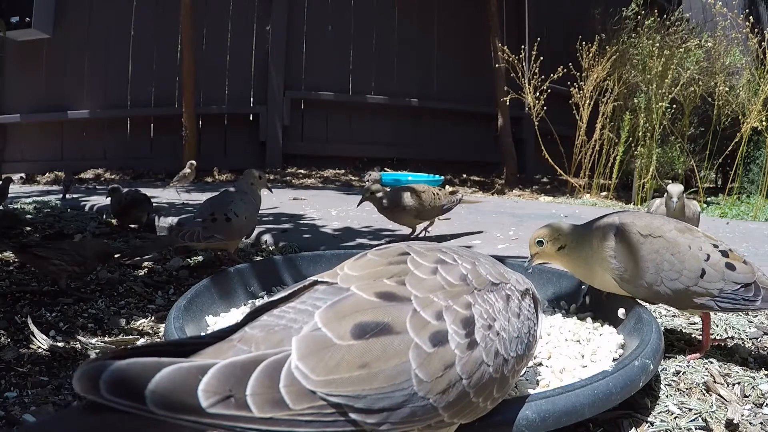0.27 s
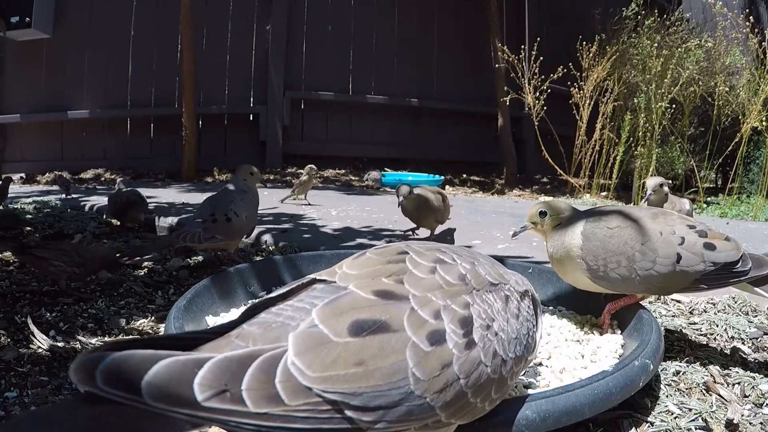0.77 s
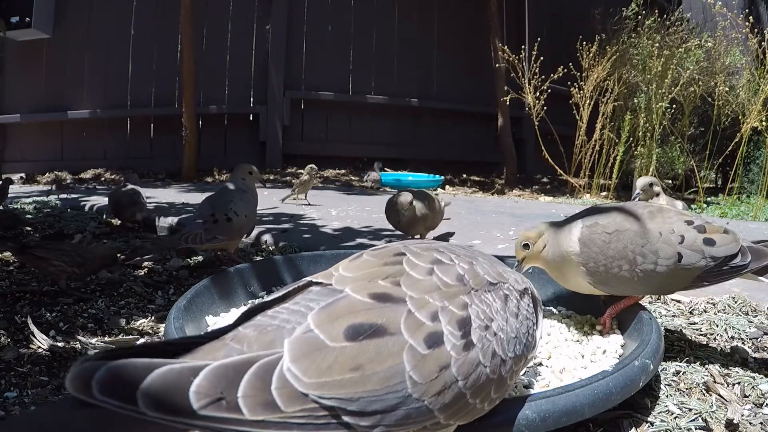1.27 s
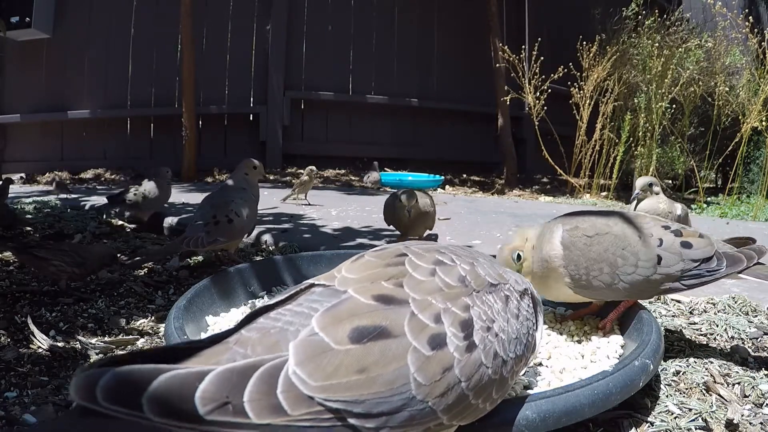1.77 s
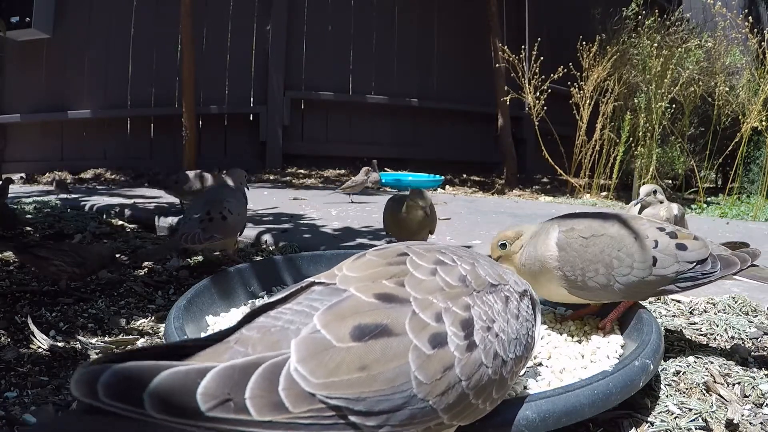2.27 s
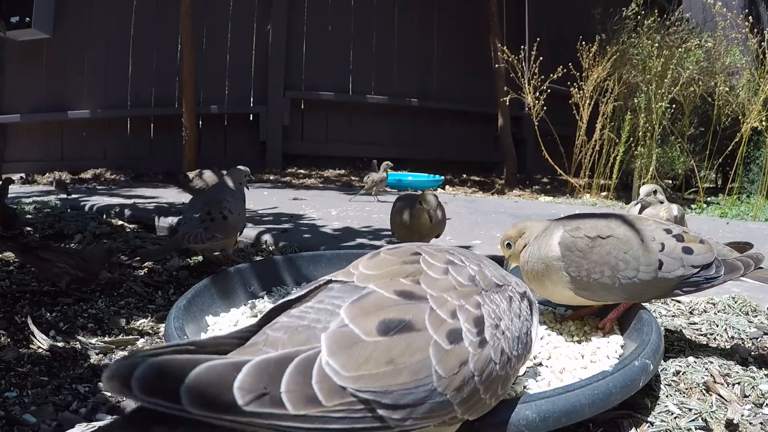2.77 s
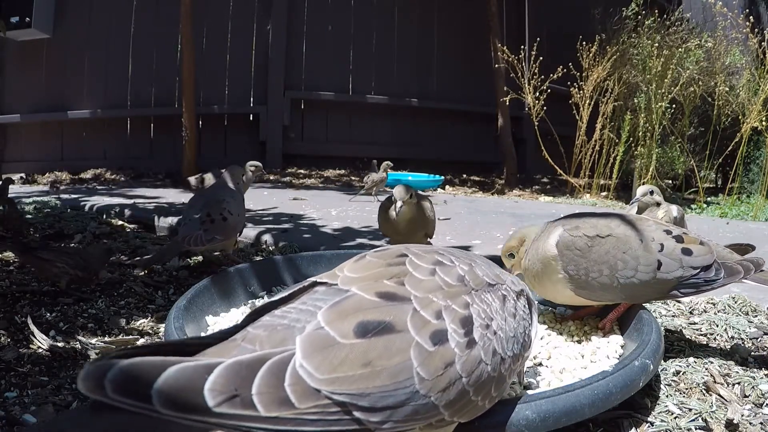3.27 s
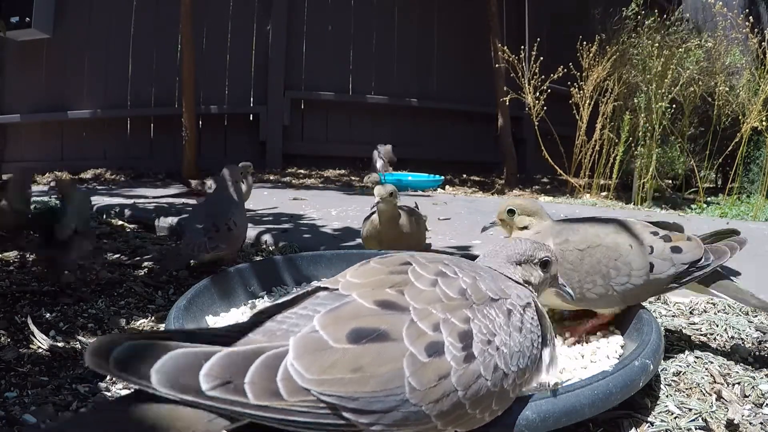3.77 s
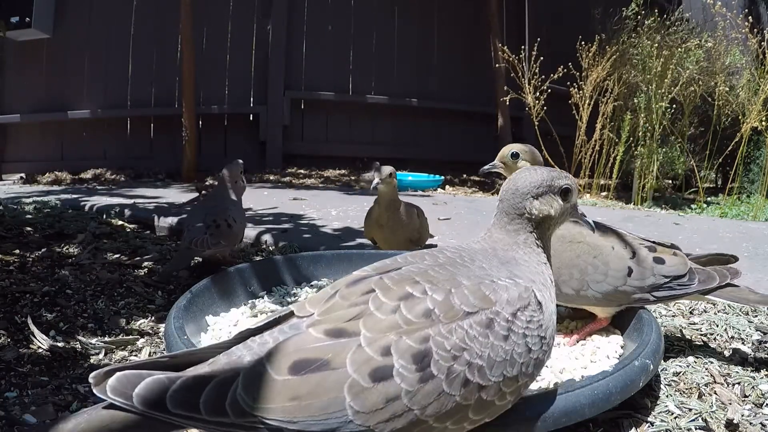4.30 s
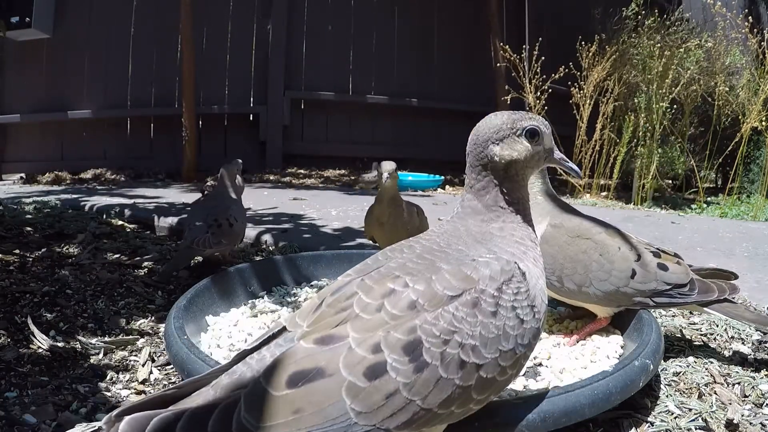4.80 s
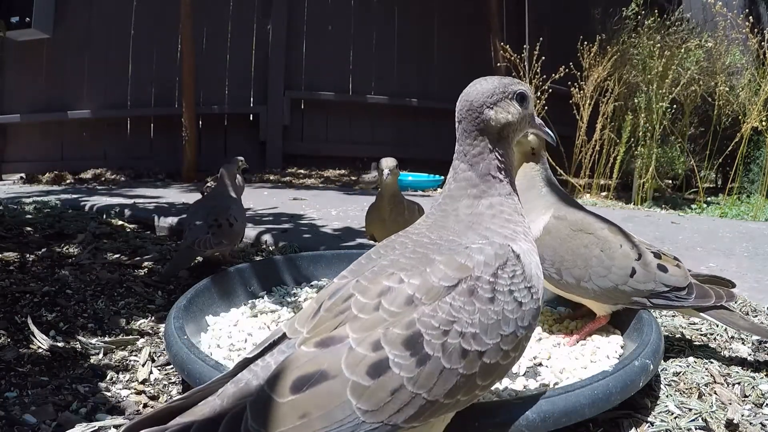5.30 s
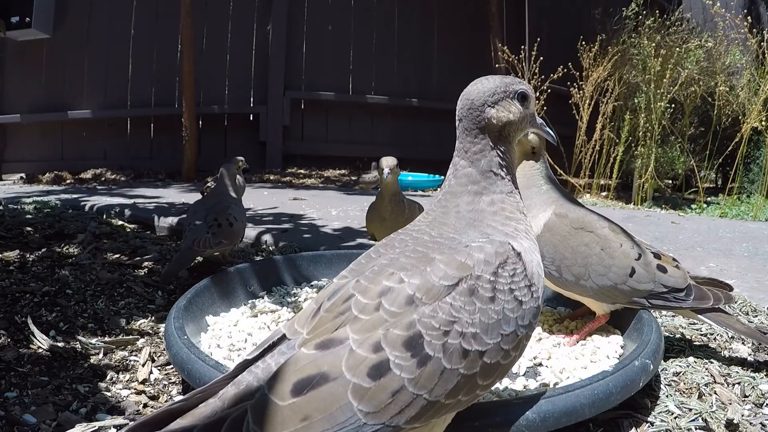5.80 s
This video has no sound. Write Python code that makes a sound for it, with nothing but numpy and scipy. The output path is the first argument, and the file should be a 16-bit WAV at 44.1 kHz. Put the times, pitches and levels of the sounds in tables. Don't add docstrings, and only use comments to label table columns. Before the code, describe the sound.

Seeds tick in a plastic dish, feathers knock and scrape right against the microphone, then doves flush with sharp wing claps and fading flaps.

```python
import sys
import numpy as np
from scipy import signal
from scipy.fft import rfft, irfft
from scipy.io import wavfile
from scipy.ndimage import uniform_filter1d

SR = 44100
rng = np.random.default_rng(int(sys.argv[2]) if len(sys.argv) > 2 else 0)


def ratio(d):
    e = np.asarray(d, float) / 20
    return 10 ** e


def bounce(signal):
    frames = np.transpose(np.atleast_2d(signal))
    limited = np.clip(frames, -1, 1)
    pcm = np.round(limited * 32767).astype(np.int16)
    wavfile.write(sys.argv[1], SR, pcm)


N = 266760
T = np.arange(N) / SR
LEFT_RIGHT = np.array([[1], [-1]])


def shape(x, table):
    hz, db = np.transpose(table)
    log_f = np.log(np.arange(x.shape[-1] // 2 + 1) * SR / x.shape[-1] + 1)
    return irfft(rfft(x) * ratio(np.interp(log_f, np.log(hz), db)), x.shape[-1])


def band(x, lo_hz, hi_hz, order=2):
    sos = signal.butter(order, [lo_hz, min(hi_hz, .45 * SR)], "bandpass", fs=SR, output="sos")
    return signal.sosfilt(sos, x) * np.sqrt(SR / 2 / (hi_hz - lo_hz))


def unit(x):
    return x / np.sqrt(np.mean(x ** 2))


def walk(rate_hz):
    hold = int(SR / rate_hz)
    steps = np.repeat(rng.standard_normal(N // hold + 1), hold)
    return 1.07 * uniform_filter1d(uniform_filter1d(steps, hold), hold)[:N]


def grit(size, spread_db):
    return rng.standard_normal(size) * ratio(spread_db * rng.exponential(size=size))


def contact(rise_ms, fall_ms, size=4096, lead=1024):
    ms = (np.arange(size) - lead) * 1000 / SR
    return ratio(np.where(ms < 0, 9 * ms / max(rise_ms, .05), -9 * ms / max(fall_ms, .05)))


def swell(s, db, rise_s, fall_s):
    return ratio(db - 8.94 * np.where(T < s, (s - T) / rise_s, (T - s) / fall_s))


def add(out, s, piece, db, lead):
    peak = uniform_filter1d(np.mean(piece ** 2, axis=0), size=60).max()
    i = int(s * SR) - lead
    n = min(piece.shape[1], N - i)
    out[:, i:i + n] += piece[:, :n] * ratio(db) / np.sqrt(peak)


# f/Hz, likeness/-1..1
PORT_LIKENESS = [(30, 0.8), (70, 0.33), (200, 0.4), (350, 0.22), (500, -0.04), (800, -0.7), (1500, -0.4),
                 (2300, -0.23), (3300, 0.4), (4200, 0.48), (5500, 0.033), (7500, -0.26), (12000, 0.043)]
# f/Hz, level/dB
LEFT_PORT_COLOUR = [(5000, 0.0), (8000, -1.6), (14000, -2)]


def ports(pair):
    likeness = np.clip(PORT_LIKENESS, -.95, None)
    side_db = [(hz, 10 * np.log10((1 - c) / (1 + c))) for hz, c in likeness]
    side = shape(pair[1], side_db)
    return np.array([shape(pair[0] + side, LEFT_PORT_COLOUR), pair[0] - side])


def soften(x):
    return signal.sosfilt(signal.butter(10, 14300, fs=SR, output="sos"), x)


def ring(modes, favour_hz, damping):
    favour_db, favour_octaves, scatter_db, detune = 5.5, 0.22, 1.8, 0.025
    t = np.arange(1280) / SR
    out = np.zeros((2, 1280))
    for hz, t60_s, left_db, right_db, phase_rad in modes:
        a, b = rng.standard_normal(2)
        near_db = favour_db * np.exp(-(np.log2(hz / favour_hz) / favour_octaves) ** 2)
        fade = ratio(scatter_db * a + near_db - 60 * damping * t / t60_s)
        fade = fade * (1 - np.exp(-t / .0011)) / np.sqrt(t60_s)
        angle = 2 * np.pi * hz * (1 + detune * b) * t
        out += fade * np.array([ratio(left_db) * np.sin(angle), ratio(right_db) * np.sin(angle + phase_rad)])
    return out


# f/Hz, t60/s, left level/dB, right level/dB, right phase/rad
LOWER_MODES = [(200, 0.038, -22, -14.5, 2), (327, 0.014, -17, -15, 2.5), (544, 0.028, -10.5, -10.5, 3),
               (670, 0.014, -9, -8, 3), (847, 0.02, -3.5, -2, 3), (948, 0.018, -12.5, -6, 4),
               (1130, 0.019, -1.5, 1, -3), (1256, 0.025, -1, 0.5, -2.5), (1420, 0.022, -6, -5, -2),
               (1700, 0.019, -8.5, -6.5, -2.0)]
# f/Hz, t60/s, left level/dB, right level/dB, right phase/rad
UPPER_MODES = [(2170, 0.019, -4.5, -9, 3.5), (2380, 0.017, 2, -8, 3), (2800, 0.0096, -9, -12.5, 0),
               (3380, 0.02, -11.5, -7, -0.8), (3890, 0.01, -10, -14, -0.7)]


def housing(slips, upper_db, favour_hz, damping):
    soft = signal.butter(3, [150, 3600], "bandpass", fs=SR, output="sos")
    slips = signal.sosfilt(soft, slips)
    lower = ring(LOWER_MODES, favour_hz, damping)
    body = lower + ratio(upper_db + 2.0) * ring(UPPER_MODES, favour_hz, damping)
    alike = ratio(-22.0) * signal.fftconvolve(slips[1], lower[0])
    return (signal.fftconvolve(slips[:1], body) + alike) / np.sqrt(np.mean(np.sum(lower ** 2, axis=1)))


# t/s, level/dB, fall/ms, upper modes/dB, pitch favoured by the spot f/Hz
QUILL_TAPS = [(0.845, -19, 3.7, -22, 980), (1.1074, -16.5, 1.6, -16.5, 1700),
              (1.1163, -16.5, 6.9, -16.5, 1390), (1.156, -31, 11, -18, 1300),
              (1.165, -14.5, 2.6, -15.5, 1070), (1.2536, -36, 3.2, -20, 1400), (1.286, -24, 0.87, -5, 1420),
              (2.0244, -38, 2.9, -12, 1300), (2.0324, -38, 5.4, -8, 1300), (2.041, -13.5, 2.6, -23, 1290),
              (2.085, -30, 3.8, -22, 1280), (2.1116, -17.5, 2.65, -12, 1910), (2.121, -31, 10, -24, 1130),
              (2.1387, -14, 3.3, -19, 1190), (2.152, -21, 5.2, -7, 2300), (2.1905, -19, 1.8, -8, 2000),
              (2.241, -13.5, 3.13, -15, 1310), (2.256, -22, 13, -13, 1350), (2.269, -31, 13, -18, 2380),
              (2.362, -16.5, 1.34, -11, 1700), (2.378, -23.5, 10.6, -14, 2300),
              (2.4023, -17.5, 1.6, -14, 1880), (2.416, -15.5, 3.3, -6, 1220), (2.4251, -13, 2.4, -10, 2400),
              (2.4325, -22, 3, -6, 1000), (2.409, -33, 2.0, -4, 1300), (2.4564, -12, 1.8, 0, 2380),
              (2.4687, -19, 1.7, -2, 2300), (2.5307, -17, 1.5, 11, 1640), (2.5645, -48, 1.8, -2, 2400),
              (2.5493, -13.5, 1.5, -5, 1400), (2.556, -26, 3.4, -6, 1410), (2.7905, -26.5, 11, -13.5, 1300)]


def knocks():
    out = np.zeros((2, N))
    for s, db, fall_ms, upper_db, favour_hz in QUILL_TAPS:
        rise_ms = 0.97 + 0.22 * fall_ms
        slips = unit(grit((2, 4096), 2.2)) * contact(rise_ms - 1.1, fall_ms - 2.6)
        slips[:, 1024] = 2.5, 1.0
        barbs = unit(grit((2, 4096), 2.0)) * contact(rise_ms, fall_ms)
        hiss = soften(band(barbs, 3300, 11000, order=3))
        add(out, s, housing(slips, upper_db + 3.5, favour_hz, damping=1.59), db, lead=1090)
        add(out, s, hiss, db + upper_db - 12.5, lead=1030)
    return out


# t/s, pressure/dB, barb hiss over ring/dB, upper modes/dB
TAIL_DRAGS = [
    [(1.176, -39, -21, -3), (1.18, -31, -10, -12), (1.187, -36, -20, -15), (1.192, -40, -7, -11),
     (1.204, -50, -20, -10), (1.208, -28, -13, -9), (1.217, -29, -10.5, -4), (1.228, -51, -19, -13)],
    [(2.153, -32, -1, 1), (2.162, -35, -18, -6), (2.168, -24.5, -9, -8), (2.174, -27, -7, -5),
     (2.186, -36, -14, -16), (2.19, -28.5, -14, -3), (2.198, -35, -6, -9), (2.202, -43, -12, -10),
     (2.22, -48, -1, -6)],
    [(2.404, -39, -26, -6), (2.436, -31, -15, -4), (2.444, -27, -15, -1), (2.447, -25.5, -10, 0),
     (2.458, -21, -15, 0), (2.47, -26.5, -1.5, 1), (2.481, -25, 3.5, -10), (2.489, -31.5, -4, -9),
     (2.499, -32, -12, 1)],
    [(2.501, -48, -13, -6), (2.505, -33, -5, -3), (2.513, -41, 1, -1), (2.516, -25, -2, -7),
     (2.523, -23, -16, -2), (2.531, -22, -1.5, -4), (2.537, -22.5, 5, -1), (2.542, -39, -16, -6),
     (2.55, -59, -17, -8)],
]


def scrapes():
    slide_ms, spread_db, ring_gain_db, hiss_gain_db = 6.89, 1.7, 16, 4
    out = np.zeros((2, N))
    hop = int(slide_ms * SR / 1000)
    for rows in TAIL_DRAGS:
        s, db, hiss_db, upper_db = np.transpose(rows)
        start = int(s[0] * SR) - hop
        t = T[start:start + 8192]
        judder = ratio(1.2 * walk(215)[:8192])
        pressure = ratio(np.interp(t, s, db, -120, -120) + ring_gain_db)
        slips = judder * unit(grit((2, 8192), spread_db)) * pressure
        for i in range(0, int(s[-1] * SR) - start, hop):
            push = slips[:, i:i + 2 * hop] * np.hanning(2 * hop)
            piece = housing(push, np.interp(t[i + hop], s, upper_db), favour_hz=1300, damping=1.24)
            out[:, start + i:start + i + piece.shape[1]] += piece
        hiss_gain = ratio(np.interp(t, s, db + hiss_db, -120, -120) + hiss_gain_db)
        barbs = judder * unit(grit((2, 8192), spread_db)) * hiss_gain
        out[:, start:start + 8192] += soften(band(barbs, 2100, 10400, order=3)) * ratio(-LEFT_RIGHT)
    return out


# t/s, level/dB, f/Hz, t60/s, likeness/-1..1
HOLLOW_BOOMS = [(0.8432, -33, 900, .010, .2), (.8435, -37, 2200, .007, .3), (.848, -38, 1270, .016, .2),
                (1.1062, -33, 2350, .008, .3), (1.1845, -23, 1230, .02, -.2), (1.2845, -36, 1300, .012, 0),
                (1.2845, -35, 1900, .008, .3), (1.106, -27.5, 1680, .012, .4), (2.245, -35, 280, .04, .2),
                (1.164, -33, 560, .012, .2), (1.179, -36, 3400, .03, .5), (1.21, -32, 3450, .03, .5),
                (2.041, -32, 2300, .008, .3), (2.045, -36, 1150, .03, 0), (2.11, -31, 2300, .01, .3),
                (2.175, -28, 1250, .03, 0), (1.209, -32, 500, .015, .2), (2.15, -32, 520, .03, .2),
                (2.484, -21, 200, .05, -.4), (2.405, -31, 260, .07, -.4), (2.465, -29, 180, .06, -.4),
                (2.416, -28, 1200, .025, -.2), (2.415, -30, 3400, .02, .5), (2.434, -28, 1150, .025, -.2),
                (2.452, -22, 3400, .03, .5), (2.48, -25, 2330, .045, .2), (2.528, -24, 3450, .016, .5),
                (2.533, -24, 2750, .016, .4), (2.521, -26, 190, .05, -.5), (2.531, -13.5, 165, .085, -.5),
                (3.654, -34, 590, .04, .9),
                (3.685, -20, 560, .02, .9), (3.7695, -28, 2500, .008, .5), (4.714, -41, 800, .015, -.3),
                  (3.64, -27, 150, .06, .9), (3.702, -22, 170, .06, .9), (3.655, -28, 1720, .03, .3),
                  (3.685, -26, 1890, .014, .3), (3.788, -28, 1500, .022, -.6),
                  (3.844, -35, 2250, .015, -.5), (4.101, -36, 1900, .01, .2), (4.327, -36, 2350, .025, -.5),
                  (4.554, -40, 1750, .018, .2), (4.627, -43, 1800, .018, .2)]


def booms():
    out = np.zeros((2, N))
    t = np.arange(6000) / SR
    for s, db, hz, t60_s, likeness in HOLLOW_BOOMS:
        fade = (1 - np.exp(-t * hz / 0.98)) * ratio(-60 * t / t60_s)
        phase = np.array([[0], [np.arccos(np.clip(likeness, -1, 1))]])
        pan = ratio(-2.5 * LEFT_RIGHT * (hz < 220))
        add(out, s, fade * np.sin(2 * np.pi * hz * t + phase) * pan, db, lead=0)
    return out


def tick(out, s, db, fall_ms, body_db, top_db, pan_db):
    force = contact(0.1, fall_ms * 0.85) + ratio(-24) * contact(1.0, 16.5)
    burst = unit(grit((2, 4096), 0.36)) * force
    colour = [(500, body_db - 43), (1300, body_db - 0.5), (3500, body_db),
              (5000, -9.5), (7200, -5.5), (9500, -8.5),
              (11500, top_db - 16.5), (14500, top_db - 18), (15600, top_db - 29), (16300, top_db - 30)]
    add(out, s, ports(shape(burst, colour)) * ratio(pan_db * LEFT_RIGHT / 2), db, lead=1030)


# t/s, level/dB, dish body/dB, left minus right/dB
SEED_TICKS = [(0.193, -27, -13, -8), (0.2039, -29, -2, -4), (0.216, -37, -16, -2), (0.2206, -29, -15, 8),
              (0.2125, -47, -13, -3), (0.2258, -28, -6, 1), (0.2278, -29, -3, -6), (0.232, -46, -5, -2),
              (0.2376, -31.5, -9, -5), (0.2386, -30, -2, -4), (0.246, -38, -14, -2), (0.2595, -35, -6, -2),
              (0.272, -46, -2, 0), (0.3027, -39, -10, 5), (0.2506, -22.5, -11, -1.5), (0.3019, -40, -6, -6),
              (0.443, -35, -8, -7), (2.98, -46, 1, 5), (0.537, -40, -5, -6), (0.845, -39, -19, -3),
              (0.568, -29.5, -14, -2), (0.5734, -35.5, -16, 7), (1.137, -37, -5, 2), (1.195, -31.5, -6, 6),
              (1.3428, -32, -5, 0), (1.3487, -31, -6, -26), (1.431, -40, 7, -8), (1.444, -35.5, -6, -1),
              (1.4486, -34.5, -2, -3), (1.577, -39, 1, -8), (1.9445, -39, -4, 0), (2.0112, -39, -7, -2),
              (2.796, -42, 8, 3), (3.1511, -35, -16, -4), (3.547, -41.5, 11, -10), (4.714, -30.5, -4, 8),
              (4.7245, -28, -15, -4)]


def seeds():
    out = np.zeros((2, N))
    for s, db, body_db, pan_db in SEED_TICKS:
        tick(out, s, db, 0.91, body_db, 0.5, pan_db)
    return out


# t/s, level/dB, dish body/dB, left minus right/dB
HUSK_SNAPS = [(.137, -40, 0, 0), (1.456, -44, 0, -2), (1.468, -45, 0, -2), (1.5635, -36.5, 6, 6),
              (2.4093, -34, -10, 1), (2.4258, -37, -4, 3), (2.4345, -29, -14, 1), (2.4785, -19, -16, 0),
              (2.488, -18, -8, 0), (2.5048, -31, -6, -1), (2.5105, -21, -10, 2), (2.5625, -38, -1, -5),
              (3.6578, -34, 0, -3), (4.0868, -36, 2, 1), (4.186, -41, -6, 2)]


def husks():
    out = np.zeros((2, N))
    for s, db, body_db, pan_db in HUSK_SNAPS:
        tick(out, s, db, 0.91, body_db, -7.5, pan_db)
    return out


# t/s, level/dB, fall/ms, dish body/dB
WING_CLAPS = [(3.612, -28, 2.3, -7.5), (3.639, -27, 3, -8), (3.6708, -25.5, 2.9, 4), (3.688, -23, 5, 7),
              (3.6235, -39, 2.0, -6), (3.742, -28, 3.0, -8), (3.751, -31, 2.0, -8), (3.779, -38, 2.0, -9),
              (3.7005, -10.5, 1.1, -6.5), (3.7304, -13, 5, -9.5), (3.7711, -18, 1.9, -8.5),
              (3.807, -27.5, 10, -9), (3.8965, -35.5, 6.5, -4), (3.93, -32.5, 0.8, 10),
              (3.9866, -26, 4.7, -7), (4.003, -34.5, 6.4, -8), (4.017, -29, 1.7, -10),
              (4.0366, -31, 4.9, -14), (4.096, -41, 11, -4), (4.159, -41, 2.4, -16),
              (4.202, -26.5, 1.9, -7), (4.2322, -27.5, 2.8, -5.5), (4.3468, -41, 7.4, -7),
              (4.3698, -39, 27, -33), (4.415, -47, 1.3, -20), (4.619, -49, 2.9, 1),
              (5.0268, -46.5, 38, -22)]


def claps():
    out = np.zeros((2, N))
    for s, db, fall_ms, body_db in WING_CLAPS:
        tick(out, s, db, fall_ms, body_db, top_db=-3, pan_db=0.5)
    return out


# f/Hz, level/dB per Hz
RUSTLE_COLOUR = [(290, 2), (500, 5.5), (591, 11.5), (950, -5.5), (1310, 4.5), (2130, 2.5), (5130, 1),
                 (5500, -1), (6970, 3), (14000, -10)]
# peak t/s, level/dB, rise/s, fall/s
RUSTLE_SWELLS = [(.135, -52.5, 0.036, 0.029), (.235, -47, 0.026, 0.039), (1.35, -54, 0.18, 0.055),
                 (1.45, -53.5, 0.031, 0.035), (1.58, -62, 0.036, 0.023), (3.62, -44, 0.0085, 0.43),
                 (3.75, -40.5, 0.082, 0.12), (4.0, -67, 0.084, 0.051), (4.1, -46.5, 0.025, 0.049),
                 (4.24, -48, 0.03, 0.035), (4.37, -50.5, 0.038, 0.067), (4.62, -54.5, 0.1, 0.061),
                 (4.725, -49.5, 0.0096, 0.042)]


def rustle():
    gain = sum(swell(*row) for row in RUSTLE_SWELLS)
    clusters = ratio(2.6 * walk(170) + 2.2 * walk(45))
    grains = unit(shape(grit((2, N), 1.95) * clusters, RUSTLE_COLOUR))
    return ports(grains) * gain * ratio(2.6)


# t/s, level/dB
DOWN_STROKES = [
    (3.62, -42),
    (3.7, -29.5),
    (3.859, -28.5),
    (4.03, -33.5),
    (4.169, -41),
    (4.3, -42.5),
    (4.4, -44.5),
    (4.621, -42),
    (4.73, -47),
]


def wing_strokes():
    gain = sum(swell(s, db, rise_s=0.051, fall_s=0.074) for s, db in DOWN_STROKES)
    flap = band(rng.standard_normal((2, N)), 123, 326) * ratio(3.1 * walk(34.96))
    return (flap[0] + 0.16 * flap[1] * LEFT_RIGHT) * gain * ratio(-6.5)


# peak t/s, level/dB, rise/ms, fall/ms,
# f/Hz
SMALL_STIRS = [(.228, -43, 8.1, 16, 1810), (1.451, -53, 25, 35, 3240), (1.58, -52, 19, 15, 3220),
               (2.722, -41, 8, 13, 1010), (3.666, -40, 14, 14, 2960), (3.69, -32, 9.2, 8, 6800),
               (3.745, -31, 10, 20, 6800), (3.791, -34, 22, 16, 1530), (4.099, -47, 10, 30, 2420),
               (4.25, -44, 12, 30, 1800), (4.368, -45.5, 6, 8, 3000), (4.578, -48, 10, 8.5, 1900),
               (4.635, -49, 10, 18, 1700), (4.73, -42.5, 5.2, 28, 5630), (5.029, -66, 3, 14, 4700),
               (5.34, -54, 45, 45, 3240)]


def stirs():
    out = np.zeros((2, N))
    half_width = 2 ** 0.18
    for s, db, rise_ms, fall_ms, hz in SMALL_STIRS:
        grains = rng.standard_normal((2, 8192)) * contact(rise_ms, fall_ms, size=8192, lead=3030)
        add(out, s, ports(band(grains, hz / half_width, hz * half_width)), db, lead=3072)
    return out


# peak t/s, 30 Hz rock/dB, rise/s, fall/s, puff over rock/dB
AIR_GUSTS = [(0.1, -69, .5, 0.84, -1), (0.64, -73, .05, 0.037, -13), (1.97, -83, .05, .1, -4),
             (2.73, -44.5, 0.15, 0.07, -2.5), (3.1, -56.5, 0.32, 0.36, -1), (3.64, -36.5, 0.023, 0.094, -5),
             (3.86, -54, .04, .05, 6), (4.02, -50, 0.055, 0.039, 9), (4.13, -51.5, .03, 0.28, 3),
             (4.95, -68, 0.27, 0.17, 8.5), (5.55, -69, 0.45, 0.62, 1)]


def air():
    rock_hz = 30.0 + 4.1 * walk(4.6)
    rock = np.sqrt(2) * np.sin(2 * np.pi * np.cumsum(rock_hz) / SR)
    puff = band(rng.standard_normal((2, N)), 43.0, 69.3)
    rock_gain = sum(swell(*row[:4]) for row in AIR_GUSTS)
    puff_gain = sum(swell(s, db + puff_db, rise_s, fall_s) for s, db, rise_s, fall_s, puff_db in AIR_GUSTS)
    return rock * rock_gain + (puff[0] + 0.44 * puff[1] * LEFT_RIGHT) * puff_gain


# start t/s, length/s, level/dB, upper band f/Hz
BUZZ_CALLS = [
    (-.03, 0.33, -52.5, 7700),
    (0.716, 0.25, -49.5, 7650),
    (2.083, 0.25, -45, 7570),
    (2.768, 0.27, -48, 7380),
    (3.153, 0.17, -57, 7700),
]


def buzz():
    out = np.zeros((2, N))
    pan_db = -0.25 * LEFT_RIGHT
    for s, length_s, db, upper_hz in BUZZ_CALLS:
        u = np.clip((T - s) / length_s, 0, 1)
        fade = np.sin(np.pi * u ** 0.6) ** 1.2
        sag = 1 - 0.056 * (2 * u - .7) ** 2
        for hz, width_hz, share_db in ((upper_hz, 240, 0), (6920, 480, -2.5)):
            low_pass = signal.butter(2, width_hz, fs=SR, output="sos")
            wobble = signal.sosfilt(low_pass, rng.standard_normal((2, N)))
            tone = np.sin(2 * np.pi * np.cumsum(hz * sag) / SR)
            out += unit(wobble * tone) * fade * ratio(db + share_db + pan_db)
    return out


# f/Hz, level/dB per Hz
HUM_COLOUR = [(15, -54), (25, -31), (66, -49), (110, -20.5), (156, 0), (333, -4.5), (370, -10.5), (456, -8),
              (507, -11), (578, -13.5), (2250, -25.5), (3700, -26.5), (4110, -21.5), (4810, -29),
              (7500, -27), (13000, -33.5), (16400, -42)]
# f/Hz, level/dB rms
MACHINE_LINES = [(339.1, -58.5), (4000, -72.5), (4075, -64.5), (4134, -66)]


def town():
    hum = unit(shape(rng.standard_normal((2, N)), HUM_COLOUR)) * ratio(-47 + 0.04 * walk(4.4))
    lines = np.zeros(N)
    for hz, db in MACHINE_LINES:
        lines += np.sqrt(2) * ratio(db + 0.18 * walk(15)) * np.sin(2 * np.pi * hz * T)
    return ports(hum) + lines * ratio(2.0 * LEFT_RIGHT)


def scene():
    feeding = knocks() + scrapes() + booms() + seeds() + husks()
    taking_off = claps() + rustle() + wing_strokes() + stirs()
    return feeding + taking_off + air() + buzz() + town()


def top_cut(x):
    return signal.sosfilt(signal.butter(12, 16470, fs=SR, output="sos"), x)


def record(dry):
    recover_s, top_hz = .15, 16450
    loud = uniform_filter1d(np.abs(dry).max(axis=0), size=400)
    keep = np.exp(-1 / (recover_s * SR))
    held = signal.lfilter([1 - keep], [1, -keep], loud)
    rounded = np.tanh(dry / (1 + 5.0 * held))
    mix = signal.sosfilt(signal.ellip(8, .5, 70, top_hz, fs=SR, output="sos"), rounded)
    return top_cut(mix)


dry = scene()
out = record(dry)
bounce(out)
```